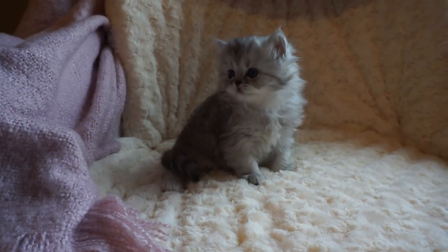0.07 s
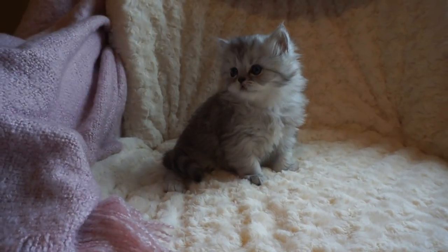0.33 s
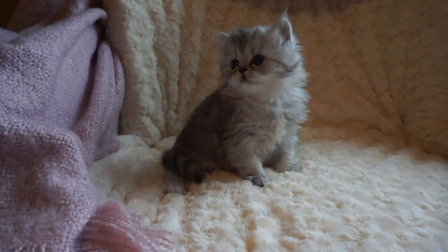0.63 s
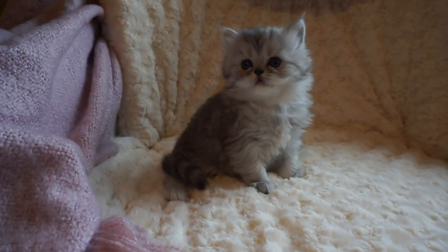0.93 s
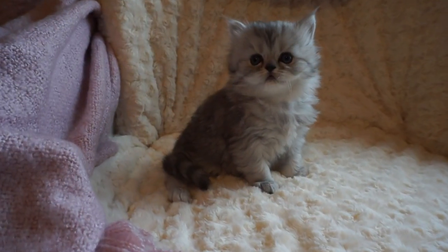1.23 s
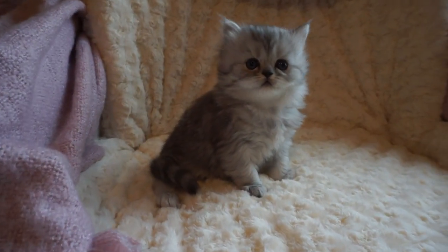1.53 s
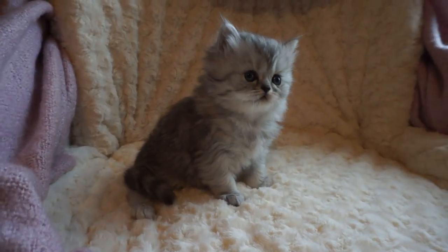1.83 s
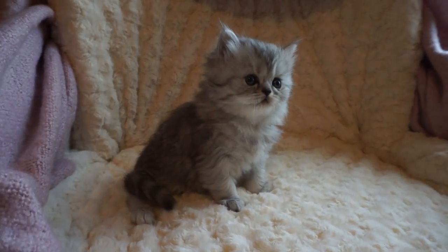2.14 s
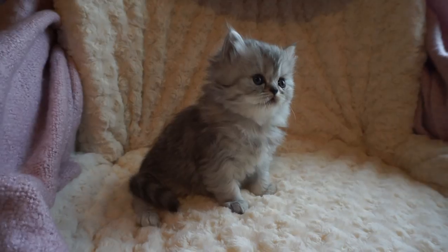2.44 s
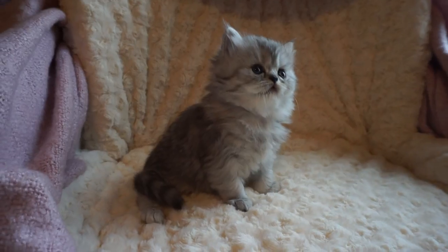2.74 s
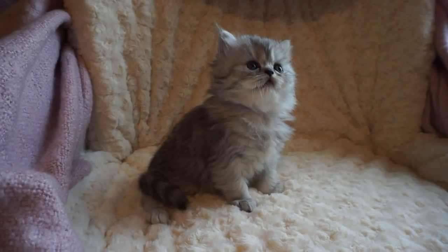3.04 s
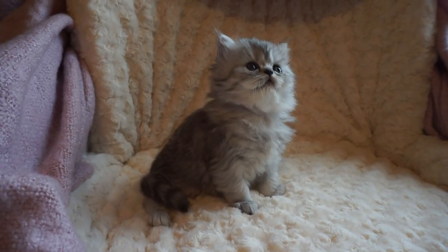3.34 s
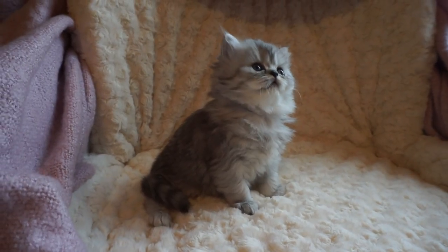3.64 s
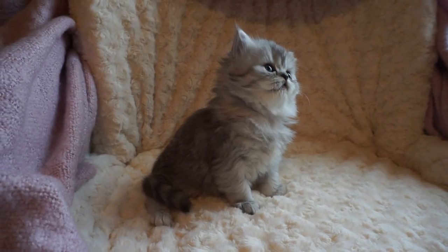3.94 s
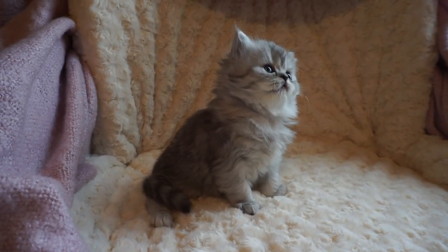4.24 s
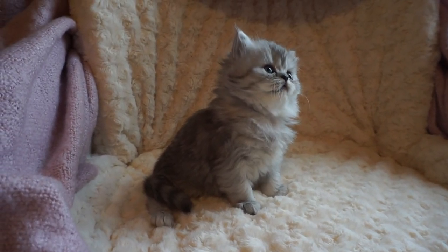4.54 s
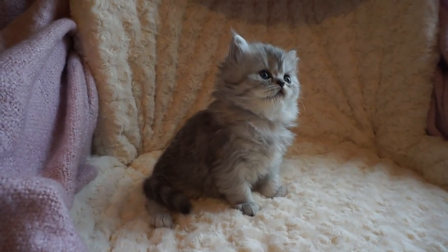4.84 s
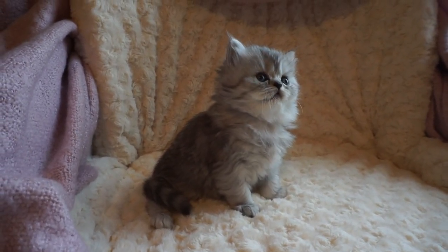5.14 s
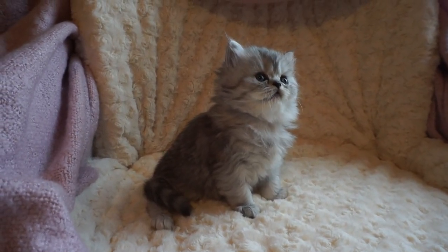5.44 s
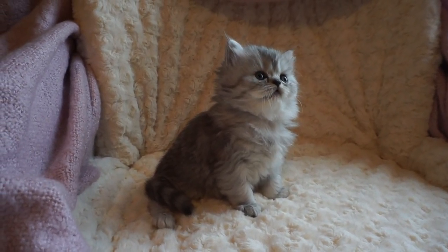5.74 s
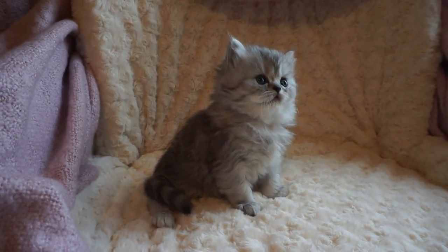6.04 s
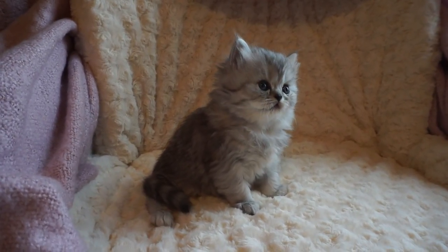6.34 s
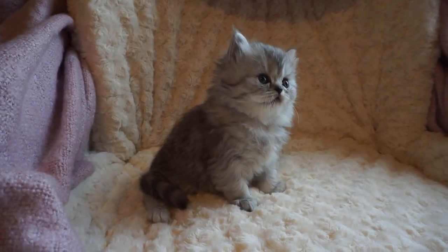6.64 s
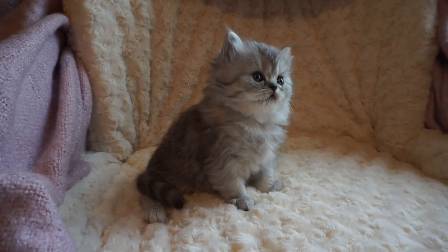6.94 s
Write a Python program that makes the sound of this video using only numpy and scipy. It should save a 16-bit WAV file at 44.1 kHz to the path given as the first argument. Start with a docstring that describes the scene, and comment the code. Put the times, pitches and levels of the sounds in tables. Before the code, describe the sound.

At about 0.3 seconds a soft, hissy stroke of cloth passes close to the microphone, with a few tiny snaps of catching fibres. A second stroke follows around 1 second. From 0.7 to 2.3 seconds comes a flurry of dull pats and scuffs on fleece bedding, busiest between 1.1 and 1.5 seconds, with a short room echo. The plastic case of a hand-held camera ticks irregularly throughout, loudest near 2 seconds. From about 2.5 to 4.7 seconds it is quiet apart from scattered ticks. Then a longer, bright slide of cloth begins, full of small snaps and slight rasps, with the sharpest snap just after 5 seconds. It fades by about 6.5 seconds, leaving a few faint ticks. Underneath lie the faint hiss and low hum of a small room, and a soft rumble that swells near the end.

```python
"""Cloth slides close to the microphone in soft, hissy strokes, its fibres catching and snapping free.
The place is a quiet room with a kitten on a fleece-covered armchair. A short flurry of pats and
scuffs on the bedding echoes in the room. The plastic case of a hand-held camera ticks as it slips
under the fingers. Beneath it all lie a faint hiss, a low hum and a slowly swelling rumble."""
import sys
import numpy as np
from scipy import signal
from scipy.fft import rfft, irfft
from scipy.io import wavfile

SR = 44100
rng = np.random.default_rng(int(sys.argv[2]) if len(sys.argv) > 2 else 0)


def wav_record(signal):
    """Record a signal, one row per channel, as 16-bit PCM in the file named by sys.argv[1]."""
    frames = np.transpose(np.atleast_2d(signal))
    bounded = np.clip(frames, -1, 1)
    # unit amplitude maps onto the largest positive 16-bit level
    quanta = np.round(bounded * 32767).astype(np.int16)
    wavfile.write(sys.argv[1], SR, quanta)


N = 308120
TIME = np.arange(N) / SR


def amp(db):
    """Turns decibels into a number to multiply a sound by."""
    return 10 ** (np.asarray(db) / 20)


def evened(x):
    """Scales a signal to an average strength (rms) of 1."""
    return x / np.sqrt(np.mean(x ** 2) + 1e-20)


def read(points, hz):
    """Reads between the rows of a table, with pitch spaced in octaves."""
    pitch, value = np.transpose(points)
    return np.interp(np.log(hz + 1), np.log(pitch + 1), value)


def bins(x):
    """The frequencies that make up x."""
    return np.fft.rfftfreq(x.shape[-1], 1 / SR)


def add(mix, s, sound):
    """Mixes a stereo sound in at s seconds."""
    part = mix[:, max(round(s * SR), 0):][:, :sound.shape[1]]
    part += sound[:, :part.shape[1]]


def panned(db):
    """Left and right gains that make the left side louder by db."""
    return amp(np.outer([.5, -.5], db))


def coloured(pair, gain, likeness, lag_ms=0):
    """Shapes the tone of two noises and makes them alike (1) or opposite (-1); the left one lags."""
    hz = bins(pair)
    same = np.clip(read(likeness, hz), -1, 1)
    mid, side = rfft(pair) * gain * np.sqrt([1 + same, 1 - same])
    delay = np.exp(-2j * np.pi * hz * lag_ms / 1000)
    return irfft([(mid + side) * delay, mid - side], pair.shape[1])


def band(hz, centre_hz, width_hz):
    """A gain that lets through mostly the pitches near the centre."""
    return 1 / (1 + (2 * (hz - centre_hz) / width_hz) ** 2)


def swell(s, rise, hold, fall, db):
    """One rounded movement: full at s, held, then fading; rise and fall are the times for 20 dB."""
    away = np.maximum(s - TIME, 0) / rise + np.maximum(TIME - s - hold, 0) / fall
    return amp(db - 20 * np.minimum(away ** 1.43, 10))


def waver(depth_db, rate_hz):
    """A gain that wanders at random, mostly slower than the given rate."""
    slow = irfft(rfft(rng.standard_normal(N)) / (1 + (bins(TIME) / rate_hz) ** 4), N)
    return amp(depth_db * evened(slow))


def burst(t, decay, tail_db, tail_decay):
    """Noise that starts at t = 0 and dies quickly, with a weaker, longer tail."""
    age = np.maximum(t, 0)
    fade = np.exp(-age / decay) + amp(tail_db) * np.exp(-age / tail_decay)
    return rng.standard_normal((2, len(t))) * (t >= 0) * fade


def grains(per_s, spread_db, decay, smooth):
    """Rubbing: many tiny slips of uneven size merge into a grainy noise."""
    slips = rng.random(N) < per_s / SR
    sizes = amp(spread_db * np.minimum(rng.exponential(1, N), 4))
    power = signal.lfilter([1], [1, -np.exp(-2 / (decay * SR))], slips * sizes ** 2)
    return rng.standard_normal((2, N)) * np.sqrt(power / power.mean() + smooth)


# how alike left and right are in the room: (pitch [Hz], likeness [-1 to 1])
ROOM_LIKENESS = [(60, 0.99), (130, 0.97), (300, 0.074), (800, -0.43), (1600, -0.44), (3000, -0.15),
                 (6000, -0.24), (14000, 0.18)]
# tone of the quiet room: (pitch [Hz], level [dB])
AIR_COLOUR = [(12, -20), (20, -11.5), (53, -2.5), (67, -6.5), (81, -34), (120, 1.5), (154, -12.5),
              (328, -20), (399, -24), (897, -20.5), (2750, -27.5), (3160, -27), (10800, -30.5),
              (13200, -30), (16000, -33.5)]
def room_air():
    """The quiet room gives a faint, steady hiss."""
    noise = rng.standard_normal((2, N))
    hz = bins(noise)
    colour = evened(amp(read(AIR_COLOUR, hz)))
    level_db = read([(150, -63), (500, -58)], hz)
    return coloured(noise, colour * amp(level_db), ROOM_LIKENESS)


# steady tones in the room: (pitch [Hz], width [Hz], level [dB])
HUM_TONES = [(54.8, 13, -70), (112.9, 11, -70), (13600, 98, -81)]
def hum():
    """Narrow bands of noise make two low hums and a faint, high whine."""
    noise = rng.standard_normal((2, N))
    tones = sum(amp(db) * evened(band(bins(noise), pitch, width)) for pitch, width, db in HUM_TONES)
    return coloured(noise, tones, ROOM_LIKENESS)


# tone of the rumble: (pitch [Hz], level [dB])
RUMBLE_COLOUR = [(30, -26), (70, -19), (85, -3.5), (104, 7.5), (128, -5), (170, -6.5), (240, -10.5),
                 (400, -15.5), (900, -22.5), (2500, -41)]
# low swells: (time [s], rise [s], hold [s], fall [s], rumble level [dB], throb level [dB])
RUMBLE_SWELLS = [(0.25, 0.76, .6, .5, -64.5, -61), (3.143, 0.39, 0.14, 0.44, -63, -54),
                 (3.9, .6, 0.085, 0.23, -63.5, -59.5), (6.178, 1.6, .25, 0.39, -55, -60.5),
                 (6.692, 0.58, 0.077, 2.6, -55, -54.5)]
def low_rumble(rumble_floor_db=-66, throb_floor_db=-63.5):
    """A rumble and a deeper throb swell slowly and sink back."""
    rumble, throb = rng.standard_normal((2, 2, N))
    hz = bins(rumble)
    rumble = evened(coloured(rumble, amp(read(RUMBLE_COLOUR, hz)), ROOM_LIKENESS))
    throb = evened(coloured(throb, band(hz, centre_hz=51.7, width_hz=36), ROOM_LIKENESS))
    rumble_gain = np.linalg.norm([swell(*shape, db) for *shape, db, _ in RUMBLE_SWELLS], axis=0)
    throb_gain = np.linalg.norm([swell(*shape, db) for *shape, _, db in RUMBLE_SWELLS], axis=0)
    rumble *= np.hypot(amp(rumble_floor_db), rumble_gain)
    throb *= np.hypot(amp(throb_floor_db), throb_gain)
    return (rumble + throb) * waver(depth_db=0.36, rate_hz=3.4)


def stroke_gain(strokes):
    """How loud the cloth is on the left and right over time; overlapping strokes add in power."""
    return np.sqrt(sum((swell(*shape) * panned(pan_db)) ** 2 for *shape, pan_db in strokes))


TURN_S = 3  # the cloth is heard first on the left before this time, first on the right after it
# tone of the cloth before and after that turn: (pitch [Hz], level [dB])
EARLY_CLOTH_COLOUR = [(500, -45), (1100, -16), (2000, -17), (4000, -12), (6000, -9), (8000, -6),
                      (10000, -3.5), (12000, -1.5), (14500, 0.5), (16000, -10)]
LATE_CLOTH_COLOUR = [(500, -39), (1200, -23.5), (2200, -16.5), (3300, -15), (4000, -12.5), (5000, -7.5),
                     (6200, -10.5), (7200, -9.5), (8000, -7.5), (9300, -3.5), (10500, -2.5), (12800, 1.5),
                     (15000, 3.5), (16000, -7)]
# how alike left and right are for the cloth: (pitch [Hz], likeness [-1 to 1])
CLOTH_LIKENESS = [(1000, 0.033), (3000, 0.18), (5000, 0.8), (7200, 0.49), (10000, 0.5), (15000, 0.27)]
# coarse, middling and fine fibres: (pitch [Hz], slips [per s], spread of sizes [dB])
FIBRES = [(5000, 700, 1.8), (10500, 300, 2.8), (14500, 260, 3.0)]
# strokes of the cloth: (time [s], rise [s], hold [s], fall [s], level [dB], left over right [dB])
CLOTH_STROKES = [(0.345, 0.093, 0.019, 0.17, -38, 2), (0.508, 0.073, 0.013, 0.2, -47, -0.5),
                 (1.037, 0.29, .12, 0.21, -43, -1.5), (1.327, .04, .02, 0.37, -51, -2),
                 (2.136, .06, .02, 0.38, -64, -4), (2.452, .06, .01, .15, -65, -2),
                 (3.68, .2, .17, .2, -70, 0), (4.12, 0.064, .01, 0.13, -65, -1),
                 (4.762, 0.047, 0.11, 0.22, -54.5, -2), (5.094, 0.29, 0.53, 0.38, -37, -2),
                 (6.09, 0.8, 0.085, 0.58, -44, -2.5)]
def cloth_slide(start_s, end_s, colour, lag_ms):
    """Cloth hisses past the microphone, never quite evenly; each kind of fibre slips on its own."""
    strokes = [row for row in CLOTH_STROKES if start_s <= row[0] < end_s]
    hz, spectrum = bins(TIME), 0
    pitches = [row[0] for row in FIBRES]
    for this_kind, (_, per_s, spread_db) in zip(np.eye(len(FIBRES)), FIBRES):
        slips = grains(per_s, spread_db, decay=.0014, smooth=.6)
        share = np.interp(hz, pitches, this_kind)  # each kind is strongest near its own pitch
        spectrum = spectrum + rfft(slips) * np.sqrt(share)
    hiss = evened(coloured(irfft(spectrum, N), amp(read(colour, hz)), CLOTH_LIKENESS, lag_ms))
    return hiss * stroke_gain(strokes) * waver(depth_db=1.63, rate_hz=19)


# fibres that snap free loudly: (time [s], level [dB], left over right [dB])
LOUD_SNAGS = [(0.302, -24, 1), (0.3338, -26, 4), (0.4088, -25, -7), (4.8726, -25.5, 0), (4.9593, -27, -4.0),
              (5.014, -22, -7), (5.0219, -26, -1), (5.0707, -16, -6), (5.0854, -22, -1), (5.1607, -22, -3),
              (5.1647, -23, -3.5), (5.296, -25, -2), (5.5944, -23, -2.5), (5.7354, -18.5, -3),
              (5.881, -21.5, -4), (6.2752, -25.5, -2), (6.4029, -30, -4)]
def snags(gain_db=14, delay_s=0.0013, lag_ms=0.075, small_per_s=9, small_boost_db=14):
    """A fibre catches and lets go with a bright snap and a fizz; small random snaps follow the strokes."""
    out, t = np.zeros((2, N)), np.arange(-128, 1920) / SR
    colour = amp(read(LATE_CLOTH_COLOUR, bins(t)) + read([(5000, -2), (9000, 0)], bins(t)))
    sliding = stroke_gain(CLOTH_STROKES)
    snaps = [(s, amp(db) * panned(pan_db)) for s, db, pan_db in LOUD_SNAGS]
    chance, scatter_db = rng.random(N), rng.standard_normal(N)
    for i in np.flatnonzero(chance < small_per_s / SR):
        snaps.append((TIME[i], sliding[:, [i]] * amp(small_boost_db - scatter_db[i])))
    for s, gain in snaps:
        snap = burst(t, decay=.0006, tail_db=-11, tail_decay=.011)
        snap = coloured(snap, colour, CLOTH_LIKENESS, lag_ms * np.sign(s - TURN_S))
        add(out, s + delay_s + t[0], amp(gain_db) * gain * snap / np.linalg.norm(snap))
    return out


# tone of the bedding: (pitch [Hz], level [dB])
BEDDING_COLOUR = [(120, -25), (220, -12), (350, -9.5), (500, -5), (650, -1.5), (950, -2), (1170, -6.5),
                  (1450, -5.5), (1900, -6.5), (2400, -9.5), (3000, -14), (6000, -20), (9000, -23),
                  (14000, -33)]
# how alike left and right are for the bedding and the echo: (pitch [Hz], likeness [-1 to 1])
DISTANT_LIKENESS = [(200, 1), (700, 0.93), (1600, 0.29), (3000, 0.25), (6000, 0.18)]
# shifts of the bedding: (time [s], rise [s], hold [s], fall [s], level [dB])
SCUFFS = [(0.35, .7, 0.16, 0.47, -68), (1.128, 0.13, 0.1, 0.16, -51.5), (1.322, 0.05, 0.084, 0.23, -49.5),
          (1.85, 0.49, 0.29, 0.38, -64.5)]
def scuffs(echo_db=-2, pan_db=2):
    """The bedding shifts between the pats with a dull rustle."""
    slips = grains(per_s=300, spread_db=2.5, decay=.002, smooth=.3)
    rustle = evened(coloured(slips, amp(read(BEDDING_COLOUR, bins(slips))), DISTANT_LIKENESS))
    rustle *= sum(swell(*row) for row in SCUFFS)
    return (rustle + amp(echo_db) * room_echo(rustle)) * panned(pan_db)


# how long the room rings: (pitch [Hz], time to fade by 60 dB [s])
ECHO_TIMES = [(250, 0.44), (700, 0.23), (1800, 0.33), (8000, 0.16)]
def room_echo(x):
    """A small furnished room: many reflections after a short gap, the highest pitches dying first."""
    t = np.arange(SR // 2) / SR
    reflections = rng.standard_normal((2, len(t))) * (t > .0085) * (1 + 5.9 * np.exp(-t / 0.0058))
    hz, age, spectrum = signal.stft(reflections, SR, nperseg=256)
    fade = np.exp(-np.log(1000) * age / read(ECHO_TIMES, hz)[:, None])
    tail = signal.istft(spectrum * fade, SR, nperseg=256)[1]
    tail = coloured(tail, 1, DISTANT_LIKENESS)
    return signal.fftconvolve(x[:1], tail / np.linalg.norm(tail[0]), axes=1)[:, :N]


# pats on the bedding: (time [s], level [dB], hollow pitch [Hz], brightness [dB])
PATS = [(0.714, -44.5, 1740, 15), (0.844, -32.5, 2000, 13), (0.906, -31.5, 980, 14), (1.061, -37, 816, -9),
        (1.097, -21, 556, -9), (1.223, -28, 703, -5), (1.29, -23.5, 680, -17), (1.338, -22, 2270, 18),
        (1.414, -25.5, 1580, 7), (1.436, -30, 734, -11), (1.461, -19.5, 940, -1), (1.828, -37.5, 910, -8),
        (1.939, -27.5, 724, -6), (2.042, -38.5, 630, -19), (2.283, -29, 1010, -10)]
def pats(gain_db=14, pan_db=3, delay_s=.0025, lag_ms=-0.088, brush_db=1):
    """Each pat is a short push and a brush on the bedding, with its own hollow pitch and an echo."""
    spots = np.zeros((4, 2, N))  # the room answers each spot differently
    t = np.arange(-256, 3840) / SR
    hz = bins(t)
    treble_share = read([(1000, 0.24), (3000, 0.55)], hz)
    push = np.outer([1, 0], t == 0)
    for k, (s, db, pitch_hz, bright_db) in enumerate(PATS):
        brush = burst(t, decay=.0018, tail_db=-15, tail_decay=.012)
        touch = push + amp(brush_db) * brush / np.linalg.norm(brush)
        hollow_db = 4 * band(hz, pitch_hz, .5 * pitch_hz)
        colour = amp(read(BEDDING_COLOUR, hz) + bright_db * treble_share + hollow_db)
        pat = coloured(touch, colour, DISTANT_LIKENESS, lag_ms)
        add(spots[k % len(spots)], s + delay_s + t[0], amp(db + gain_db) * pat / np.linalg.norm(pat))
    return sum(spot + room_echo(spot) for spot in spots) * panned(pan_db)


# notes at which the camera's case rings: (pitch [Hz], width [Hz], level [dB])
CASE_NOTES = [(1320, 1100, -3.5), (2430, 203, 3.5), (3300, 290, 1.5), (3760, 390, 1.5), (4860, 460, 1.5),
              (5410, 190, -1.5), (6570, 1060, -6.5), (7930, 190, -9), (11200, 600, -11.5)]
# how alike left and right are for the case: (pitch [Hz], likeness [-1 to 1])
CASE_LIKENESS = [(1000, -0.075), (2500, 0.39), (4200, 0.078), (7000, -0.39), (11000, 0.57), (15000, 0.16)]
# slips of the case: (time [s], level [dB], brightness [dB], wait until it springs back [s])
CASE_TICKS = [(0.757, -37, -19, 0.0018), (1.0065, -23, 4, 0.0083), (1.15, -37.5, -18, .003),
              (1.3938, -23.5, -2, .006), (1.5684, -22, 0.5, 0.0062), (1.7894, -26, 1.5, 0.0072),
              (1.9524, -25.5, -1, 0.02), (1.9596, -16.5, 4.5, 0.0019), (2.0572, -31, -12, 0.0022),
              (2.1183, -32, -12, 0.018), (2.6492, -33.5, -8, 0.0036), (2.6585, -27.5, 5.5, 0.012),
              (3.009, -37, -22, .005), (3.1721, -35.5, -1, 0.0055), (3.3587, -46.5, -26, 0.0071),
              (3.529, -34.5, -3, 0.0074), (3.6943, -39, -17, 0.0076), (3.904, -29, -4.5, .017),
              (4.0685, -45, -25, 0.0019), (5.1427, -29, 2, 0.0053), (5.8841, -26.5, -1, 0.018),
              (6.0523, -36, -6, 0.0022), (6.4935, -42.5, 0, 0.0026), (6.7017, -44.5, -22, 0.0039),
              (6.8926, -38.5, -5, 0.013)]
def case_ticks(gain_db=14, echo_db=-15, treble_db=10, pan_db=1.5, delay_s=0.0017, rebound_db=-5):
    """The plastic case creeps under the fingers, slips and springs back, ringing briefly each time."""
    out, t = np.zeros((2, N)), np.arange(-256, 1792) / SR
    hz = bins(t)
    treble_share = read([(5500, 0.15), (10000, 0.85)], hz)
    ring = sum((-1) ** k * amp(db) / (1 + 2j * (hz - pitch) / width)
               for k, (pitch, width, db) in enumerate(CASE_NOTES))
    crack = 1j * amp(-13) * hz / (hz + 1500)
    case = (ring + crack) * amp(read([(900, -11), (2200, 0)], hz))  # low pitches are weaker
    slips = [(s, db, bright_db) for s, db, bright_db, _ in CASE_TICKS]
    rebounds = [(s + wait, db + rebound_db, bright_db) for s, db, bright_db, wait in CASE_TICKS]
    for s, db, bright_db in slips + rebounds:
        slip = burst(t, decay=.0007, tail_db=-15, tail_decay=.0035)
        creep = amp(-14) * rng.standard_normal(slip.shape) * np.exp(-abs(t) / 0.0033)
        colour = case * amp((treble_db + bright_db) * treble_share)
        tick = coloured(slip + creep, colour, CASE_LIKENESS)
        add(out, s + delay_s + t[0], amp(db + gain_db) * tick / np.linalg.norm(tick))
    return out * panned(pan_db) + amp(echo_db) * room_echo(out)


# wide rasps and narrow squeaks: (time [s], length [s], pitch [Hz], width [Hz], level [dB])
CLOTH_RASPS = [(1.338, 0.06, 2280, 800, -53), (4.58, 0.3, 3130, 230, -64), (5.124, 0.062, 4130, 2800, -47),
               (5.295, 0.034, 4000, 3500, -46), (5.377, 0.029, 3560, 3000, -48),
               (6.025, 0.29, 3050, 650, -59)]
def rasps():
    """Where the cloth is pressed harder it rasps or squeaks: fuzzy notes that swell and fade."""
    out, t = np.zeros((2, N)), TIME[:SR // 2]
    for s, length, pitch, width, db in CLOTH_RASPS:
        noise = rng.standard_normal((2, len(t)))
        note = evened(coloured(noise, band(bins(noise), pitch, width), ROOM_LIKENESS))
        add(out, s, amp(db) * note * np.sin(np.pi * np.minimum(t / length, 1)))
    return out


def scene():
    """The cloth, the bedding, the case and the room, all together."""
    cloth = cloth_slide(0, TURN_S, EARLY_CLOTH_COLOUR, lag_ms=-0.069)
    cloth += cloth_slide(TURN_S, N / SR, LATE_CLOTH_COLOUR, lag_ms=0.072)
    touches = pats() + scuffs() + case_ticks() + rasps()
    background = room_air() + hum() + low_rumble()
    return cloth + snags() + touches + background


def record(dry):
    """Cuts away the very highest pitches."""
    low_pass = signal.firwin(511, cutoff=16050, window=("kaiser", 9), fs=SR)
    return signal.oaconvolve(dry, low_pass[None], "same")


dry = scene()
out = record(dry)
wav_record(out)
```